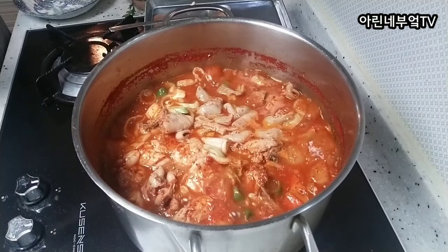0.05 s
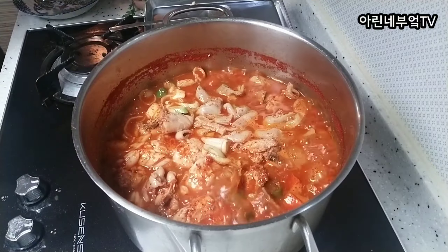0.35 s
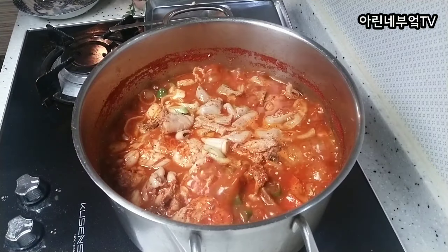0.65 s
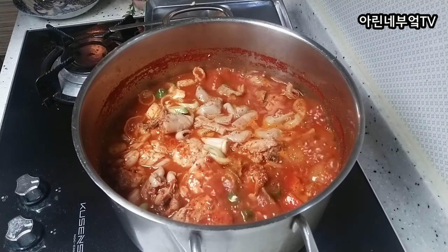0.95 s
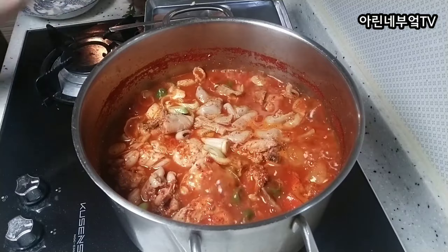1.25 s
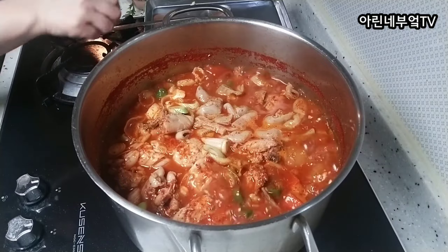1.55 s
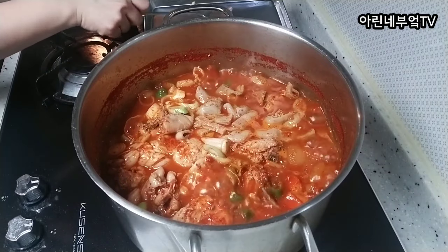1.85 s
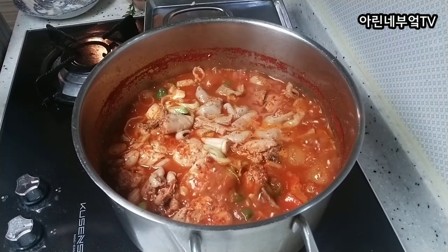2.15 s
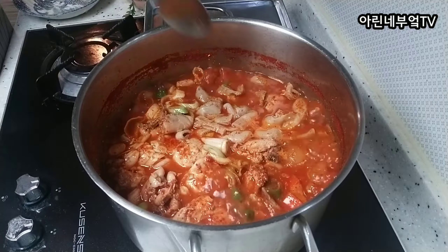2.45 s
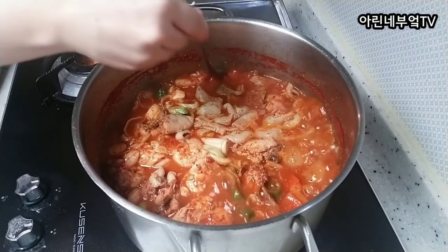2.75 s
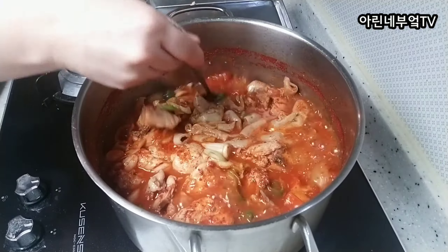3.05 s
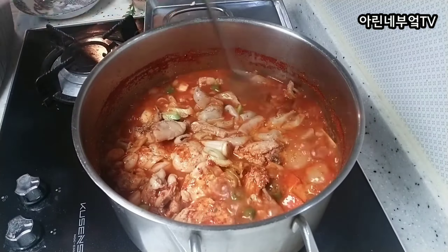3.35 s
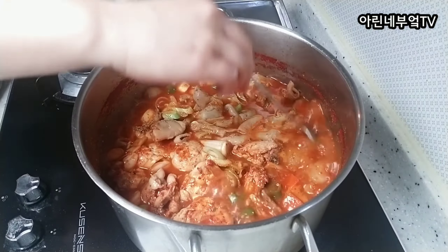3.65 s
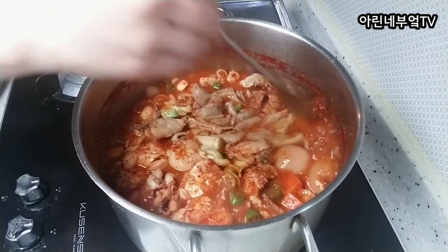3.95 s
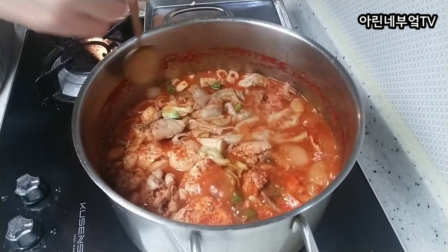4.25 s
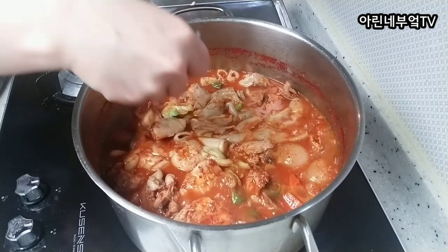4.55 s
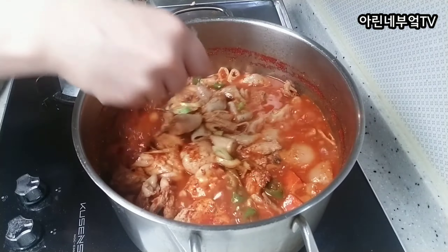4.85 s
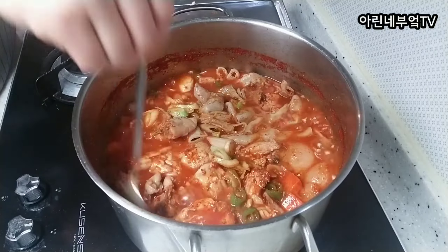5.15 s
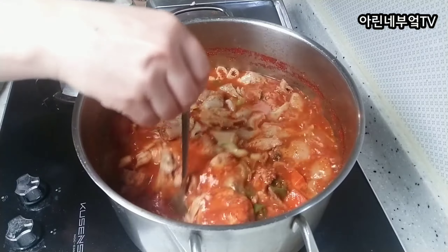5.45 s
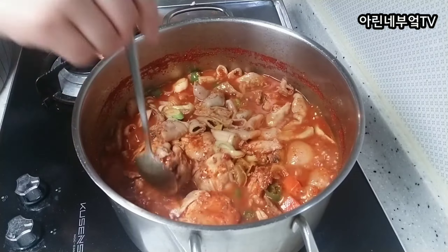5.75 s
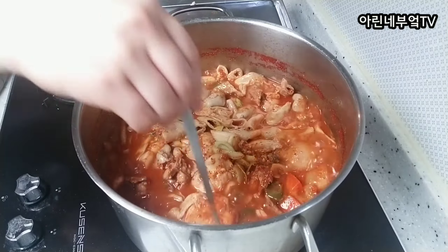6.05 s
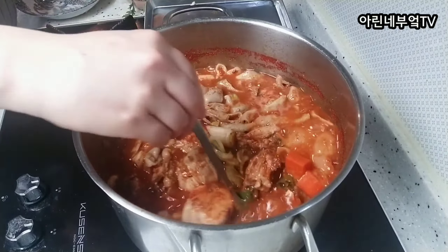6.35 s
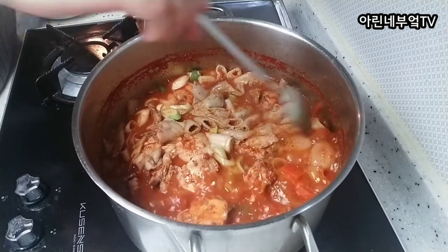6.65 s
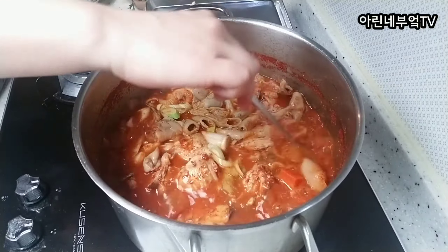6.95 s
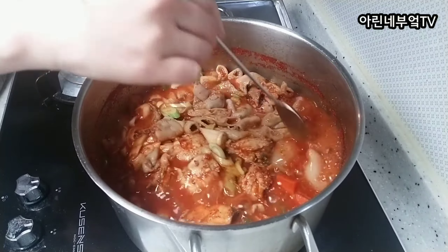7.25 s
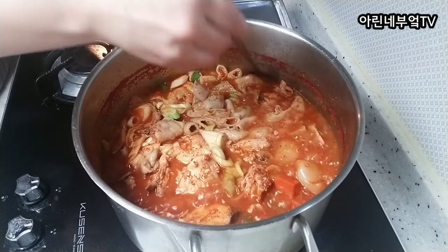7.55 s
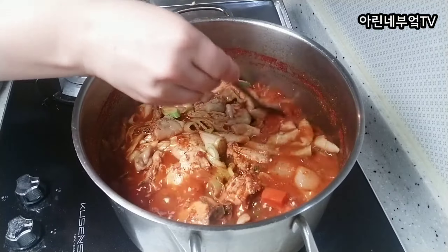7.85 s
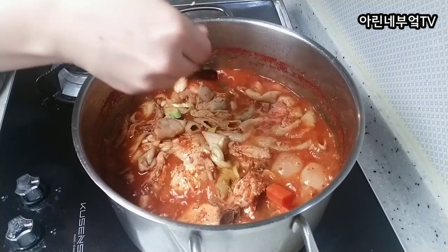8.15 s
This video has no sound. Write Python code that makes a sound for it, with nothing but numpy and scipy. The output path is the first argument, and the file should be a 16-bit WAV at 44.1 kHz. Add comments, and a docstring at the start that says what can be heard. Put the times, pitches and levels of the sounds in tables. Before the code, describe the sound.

Thick stew boils throughout in an open steel pot, heard close above the rim in a small kitchen with a slight echo. Small bubbles pop in clusters with a fine crackle and larger plops stand out, over the soft hiss and low roar of a gas burner. In the first 0.3 seconds utensils tap lightly with dull bumps. Around 0.9 seconds a few heavier thumps shake the counter, and a drop of broth sizzles briefly at about 1.2 seconds. Near 2 seconds a steel spoon is picked up with a chink and a small scrape. From about 2.8 seconds it stirs, knocking irregularly against the pot, with strong clinks between 4.4 and 4.9 seconds. Short scrapes come around 5.5 seconds and, louder, around 6.4 seconds. A hollow knock at 7.5 seconds and a sharp clink at 7.8 seconds follow as the bubbling continues.

```python
"""Stirring a boiling stew

Thick stew boils in an open steel pot on a hissing gas ring in a small kitchen. Bubbles burst
and ring the air in the pot; a steel spoon knocks, clinks and scrapes as it stirs.
Early on something thumps the counter, and a drop of broth sizzles into steam."""
import sys
import numpy as np
from scipy import signal
from scipy.fft import rfft, irfft
from scipy.io import wavfile

SR = 44100
rng = np.random.default_rng(int(sys.argv[2]) if len(sys.argv) > 2 else 0)


def master_out(mix):
    """Clip the mix to full scale and print it as 16-bit PCM to the path in sys.argv[1]."""
    frames = np.transpose(np.atleast_2d(mix))
    ceiling = np.clip(frames, -1, 1)
    pcm = np.round(ceiling * 32767).astype(np.int16)
    wavfile.write(sys.argv[1], SR, pcm)


N = 361179
TIME = np.arange(N) / SR


def from_db(db):
    """Turn decibels into a number to multiply a sound by."""
    return 10 ** (np.asarray(db) / 20)


def rms_one(x, size=None):
    """Scale a sound so its average strength (rms) is 1, judged on the first `size` samples if given."""
    return x / np.sqrt(np.mean(x[:size] ** 2) + 1e-20)


def curve(points):
    """Join (time, value) points with straight lines, giving a value for every sample."""
    return np.interp(TIME, *np.transpose(points))


def add(out, start_s, sound):
    """Mix a sound in at the given time."""
    at = int(np.clip(round(start_s * SR), 0, N - 1))
    out[at:at + len(sound)] += sound[:N - at]


def noise(t):
    """White noise, one sample for each time in t."""
    return rng.standard_normal(len(t))


def filtered(x, hz, kind, order=2):
    """Keep the "low" side, the "high" side or a "band"; a higher order cuts more sharply."""
    return signal.sosfilt(signal.butter(order, hz, kind, fs=SR, output="sos"), x)


def resonance(x, hz, width_hz):
    """Pick out one narrow note from a sound."""
    return signal.lfilter(*signal.iirpeak(hz, hz / width_hz, fs=SR), x)


def fade(t, t60):
    """Die away by 60 dB every t60 seconds."""
    return from_db(-60 * t / t60)


def struck(notes, t):
    """Ring an object's own notes; their strength and phase depend on the spot that is hit."""
    spot = rng.uniform(.55, 1.45, len(notes))
    ring = sum(gain * from_db(db) * fade(t, t60) * np.sin(2 * np.pi * (hz * t + rng.random()))
               for gain, (hz, db, t60) in zip(spot, notes))
    return rms_one(ring, size=400)


def coloured_noise(colour):
    """Steady noise with a given balance of low and high pitches."""
    hz, db = np.transpose(colour)
    gain = from_db(np.interp(np.log(np.fft.rfftfreq(N, 1 / SR) + 1), np.log(hz), db))
    return rms_one(irfft(rfft(noise(TIME)) * gain, N))


def drift(per_s):
    """Wander at random by about 1 either way, heading for a new value per_s times a second."""
    return np.interp(TIME * per_s, np.arange(1000), rng.standard_normal(1000))


# How loud the gas is; it sinks while the arm is over the pot: t/s, level/dB
GAS_LEVEL = [(0.0, -53), (0.41, -52.5), (4.65, -53.5), (5.24, -63), (5.5, -62), (5.81, -60.5), (6.43, -53),
             (7.64, -53.5), (8.19, -57.5)]
# The colour of the gas hiss: f/Hz, level/dB
HISS_COLOUR = [(1500, 17.5), (2500, 9), (3500, 8.5), (5600, 8), (7100, 4.5), (9000, -2), (10200, 1),
               (15500, -3.5)]
# The colour of the flame's roar: f/Hz, level/dB
ROAR_COLOUR = [(20, -25), (45, 5.5), (80, -1), (132, 9.5), (200, -0.5), (380, -3), (600, -7), (1300, -71),
               (2200, -10), (3500, -60)]
# The whistles of the gas jet: f/Hz, width/Hz, level/dB
JET_WHISTLES = [(7820, 550, 17), (8620, 140, 18), (9300, 38, 21), (9200, 410, 15.5)]
def burner(hiss_boost_db=7, roar_db=-45.5, jet_db=-56.5):
    """The flame roars low, the gas hisses, and the jet's thin whistles waver against one another."""
    gas_db = curve(GAS_LEVEL)
    swing_db = gas_db - gas_db.mean()
    whistles = np.zeros(N)
    for hz, width, db in JET_WHISTLES:
        gain = from_db(db - 0.4 * drift(3.14))
        band_hz = [hz - width / 2, hz + width / 2]
        whistles += gain * rms_one(filtered(noise(TIME), band_hz, "band", order=1))
    hiss = from_db(gas_db + hiss_boost_db + .5 * drift(30)) * coloured_noise(HISS_COLOUR)
    roar = from_db(roar_db + 0.66 * swing_db + 2.5 * drift(47)) * coloured_noise(ROAR_COLOUR)
    weak_start_db = curve([(2.2, -4), (2.39, 0)])  # the whistles grow stronger part-way through
    return hiss + roar + from_db(jet_db + swing_db + weak_start_db) * rms_one(whistles)


# The notes of the air held in the pot: f/Hz, level/dB, fade time t60/s
POT_AIR_NOTES = [(489, 1.5, 0.3), (633, -1, 0.45), (860, 11, 0.011), (1189.6, 20.5, 0.04),
                 (1266, 19, 0.027), (1547, 34, 0.0048), (1790, 12, 0.11)]
def pop(hz, snap_db=2, neighbour_db=-9, rise=0.019, wall_db=-30, air_db=-41):
    """A bubble opens and rings with rising pitch, three neighbours burst too, and the pot answers."""
    t = TIME[:4096]
    bubbles = from_db(snap_db) * noise(t) * fade(np.abs(t - .005), .012)  # begin with the snap
    starts = np.r_[.004, rng.uniform(0, .016, 3)]
    pitches = hz * np.r_[1, 2 ** rng.uniform(-.3, .75, 3)]
    gains = from_db([0] + 3 * [neighbour_db])
    for start, pitch, gain in zip(starts, pitches, gains):
        swell_s = 0.0011 * (1000 / pitch) ** 1.7  # big, low bubbles open slowly and ring longest
        opened = np.maximum(t - start, 0) / swell_s
        gliding_hz = pitch * (1 + rise * (np.minimum(opened, 6) - 2))
        cycles = np.cumsum(gliding_hz) / SR
        bubbles += gain * opened * np.exp(1 - opened) * np.sin(2 * np.pi * cycles)
    pot = from_db(wall_db) * noise(t) * fade(t, 0.077) + from_db(air_db) * struck(POT_AIR_NOTES, t)
    pot[0] += 1  # the sound that comes straight to the ear
    burst = signal.fftconvolve(bubbles, pot)[:len(t)]
    body = filtered(burst, max(2200, 1.19 * hz), "low", order=8)
    spray = from_db(-20) * filtered(burst, 4000, "low")
    return rms_one(body + spray, size=700)


BUBBLE_LOW_HZ = 156  # bubbles have little body below this
# How hard the stew boils, as the loudness of its small bubbles: t/s, level/dB
BOIL_LEVEL = [(0.0, -34.5), (0.45, -43.5), (0.7, -39.5), (0.83, -59), (1.1, -39.5), (2.8, -42),
              (2.94, -40.5), (3.35, -39.5), (3.7, -35), (4.36, -43), (4.81, -38.5), (5.08, -43.5),
              (5.3, -42.5), (5.47, -37.5), (5.64, -45.5), (5.8, -49), (5.9, -45.5), (6.32, -39.5),
              (6.68, -43.5), (7.07, -37), (7.8, -44), (8.19, -40.5)]
def simmer(per_s=85, size_db=5, centre_hz=920, spread_octaves=0.4326, bunching=0.65):
    """Many small bubbles of mixed pitch and size burst in loose clusters."""
    out = np.zeros(N)
    pitches = centre_hz * 2 ** (spread_octaves * np.linspace(-1.6, 1.6, 40))
    pops = [pop(hz, snap_db=-5) for hz in pitches]
    chances = rng.random((4000, 3))
    rate = per_s * np.exp(bunching * drift(20))
    for k, (when, size, luck) in enumerate(chances):
        if luck < rate[int(when * N)] * TIME[-1] / len(chances):
            gain = from_db(size_db * min(-np.log(size), 2))  # most are quiet, a few are loud
            add(out, when * TIME[-1], gain * pops[k % len(pops)])
    return from_db(curve(BOIL_LEVEL)) * rms_one(filtered(out, BUBBLE_LOW_HZ, "high"))


def bright_tick(hz, t60, width=1.34):
    """A short, bright tick: a band of noise that dies away quickly."""
    t = TIME[:5000]
    return rms_one(filtered(noise(t) * fade(t, t60), [hz / width, hz * width], "band"), size=1323)


def fizz(per_s=140, size_db=2.5, below_boil_db=19):
    """Tiny bubbles at the pot wall burst in a fine, uneven crackle that follows the boil."""
    out = np.zeros(N)
    ticks = [bright_tick(hz, t60=0.0092) for hz in np.geomspace(3000, 12000, 24)]
    for k, (when, size) in enumerate(rng.random((int(per_s * TIME[-1]), 2))):
        gain = from_db(size_db * min(-np.log(size), 3))
        add(out, when * TIME[-1], gain * ticks[k % len(ticks)])
    return from_db(curve(BOIL_LEVEL) - below_boil_db) * rms_one(out)


def balance_hit(hit, knock_db, clink_db, brightness, pivot_hz=2770, top_loss_db=56):
    """Set a hit's level in four bands: the hollow knock lowest, then the clink, tilted by brightness."""
    edges_hz = np.array([170, 800, 2500, 9000, 16000])
    clink_centres_hz = np.sqrt(edges_hz[1:-1] * edges_hz[2:])
    middle, high, top = clink_db + brightness * np.log2(clink_centres_hz / pivot_hz)
    levels_db = knock_db, middle, high, top - top_loss_db  # the highest band is kept very quiet
    return sum(from_db(db) * rms_one(filtered(hit, band_hz, "band", order=4), size=1323)
               for db, band_hz in zip(levels_db, zip(edges_hz, edges_hz[1:])))


# The notes of the steel pot and spoon: f/Hz, level/dB, fade time t60/s
STEEL_NOTES = [(1280, 7, 0.28), (1480, -3, 0.083), (1654, 9, 0.27), (1702, -17, 0.092), (1900, 7, 0.059),
               (2035, 10, 0.022), (2196, -8, 0.26), (2540, -19, 0.27), (2710, -4, 0.28), (3630, -14, 0.11),
               (3905, 7.5, 0.039), (4376, 11, 0.017), (4820, 2.5, 0.088), (5120, 3, 0.15), (5750, 1, 0.06),
               (6014, 0, 0.062), (6210, 4, 0.071), (6680, 8.5, 0.035), (8600, 2.5, 0.067)]
# Steel utensils knocking, first beside the pot, then the spoon in it: t/s, clink level/dB,
# brightness/(dB per octave), knock level/dB, contact time/s, fade time t60/s, pot f/Hz, spoon f/Hz
SPOON_HITS = [(0.1167, -41.5, 0.5, -38, 0.0034, 0.35, 1190, 4000),
              (0.17, -42.5, 11.5, -33.5, 0.0022, 0.022, 1170, 4700),
              (0.284, -55.5, 6, -45, 0.0041, 0.076, 800, 4800),
              (1.978, -40, -4, -32, 0.0088, 0.21, 670, 7560),
              (2.7807, -29.5, -3, -24, 0.0068, 0.067, 850, 6660),
              (2.911, -28.5, 3.5, -30, 0.0044, 0.026, 1590, 5000),
              (3.605, -36, -7.5, -29, 0.0064, 0.02, 480, 7340),
              (4.387, -29, -6.5, -25, 0.0043, 0.069, 420, 7740),
              (4.669, -21, 1, -26.5, 0.0034, 0.12, 696, 3470),
              (4.912, -22.5, -1.5, -27.5, 0.0026, 0.027, 1614, 5300),
              (5.398, -45, 12.5, -41, 0.002, 0.057, 650, 6400),
              (6.086, -41.5, -8, -28.5, 0.0057, 0.042, 890, 4120),
              (6.3002, -36.5, 3.5, -39.5, 0.00031, 0.048, 1060, 6370),
              (6.403, -29, 2.5, -30, 0.00089, 0.1, 1520, 5300),
              (6.742, -44, 7.5, -64, 0.0028, 0.024, 900, 5700),
              (6.864, -32.5, 2, -32, 0.0031, 0.054, 480, 6800),
              (6.9706, -34.5, 0.5, -62, 0.00014, 0.018, 2230, 5100),
              (7.526, -23.5, -5.5, -16.5, 0.0097, 0.011, 1127, 4330),
              (7.7719, -22, 1.5, -28.5, 0.00055, 0.078, 1870, 6060)]
def spoon_hits(held_db=-4.5, air_db=-1, note_db=5, free_db=-12, tail_db=-16):
    """A short rattling touch rings steel and air; food on the spoon dulls it, bare steel is bright."""
    out, t = np.zeros(N), TIME[:16384]
    for start_s, clink_db, brightness, knock_db, contact_s, t60, pot_hz, spoon_hz in SPOON_HITS:
        contact = fade(np.maximum(t - contact_s, 0), t60) + from_db(12.5) * fade(t, 0.0037)
        contact *= 1 - np.exp(-t / (1e-4 + .25 * contact_s))  # a longer touch starts more softly
        crack = filtered(noise(t) * contact, 240, "high", order=1)
        steel = struck(STEEL_NOTES, t)
        held_ring = from_db(held_db) * contact * steel
        air = from_db(air_db) * np.sqrt(contact) * struck(POT_AIR_NOTES, t)
        hit = filtered(crack + held_ring + air, 3800, "low", order=1)
        # the spot struck and the grip bring out one note of the pot and one of the spoon
        notes = resonance(hit, pot_hz, width_hz=110) + resonance(hit, spoon_hz, width_hz=220)
        hit += from_db(note_db) * notes
        # the wall rings on: its main notes over a crowd of weaker ones
        free_ring = from_db(free_db) * filtered(steel, 5500, "low", order=1)
        tail = from_db(tail_db) * filtered(noise(t), [1100, 5500], "band") * fade(t, 0.3)
        freedom = from_db(-700 * contact_s)  # a spoon that stays in the stew is hushed by it
        hit += freedom * (free_ring + tail)
        add(out, start_s, balance_hit(hit, knock_db, clink_db, brightness))
    return out


# Crisp, high ticks: drops of broth spatter off the spoon and utensils, mostly as they knock: t/s, level/dB,
# f/Hz
BROTH_SPATTERS = [(0.171, -37, 8800), (0.283, -47, 10500), (1.054, -44.5, 5940), (2.784, -41.5, 10500),
                  (2.911, -40, 10500), (2.93, -42, 11000), (4.387, -50, 9000), (4.67, -45, 12000),
                  (5.395, -47, 11000), (6.154, -49.5, 6000), (6.3, -43.5, 10400), (6.864, -46, 10500),
                  (7.273, -42, 5350), (7.771, -33, 8600)]
def broth_spatters():
    """Short bursts of high noise: drops of broth snap and spatter, most of them as a knock of steel lands."""
    out = np.zeros(N)
    for start_s, db, hz in BROTH_SPATTERS:
        add(out, start_s, from_db(db) * bright_tick(hz, t60=0.083))
    return out


# The low notes of the counter and stove: f/Hz, level/dB, fade time t60/s
COUNTER_NOTES = [(65, -8, 0.33), (85, -7.5, 0.23), (115, -3.5, 0.18), (227, 1.5, 0.045), (430, -10, 0.055)]
# Dull bumps through the counter: t/s, level/dB, lowest f/Hz, highest f/Hz
COUNTER_BUMPS = [(0.172, -15.5, 173, 300), (0.283, -19.5, 181, 290), (0.851, -10, 55, 550),
                 (0.912, -17, 80, 400), (0.991, -21, 70, 557), (1.064, -17.5, 107, 260)]
def bumps(rattle_db=6, clack_db=-21, grate_db=-27, grate_hz=780, onset_s=0.0036):
    """Soft, heavy bumps shake the counter; things on it rattle and clack, and the stove grate rings."""
    out, t = np.zeros(N), TIME[:24000]
    boom = sum(from_db(db) * fade(t, t60) * np.sin(2 * np.pi * hz * t) for hz, db, t60 in COUNTER_NOTES)
    grate = from_db(grate_db) * fade(t, 0.52) * np.sin(2 * np.pi * grate_hz * t)
    for start_s, db, low_hz, high_hz in COUNTER_BUMPS:
        rattle = from_db(rattle_db) * noise(t) * fade(t, 0.17)
        clack = from_db(clack_db) * rms_one(filtered(noise(t), [1200, 2400], "band")) * fade(t, 0.11)
        thud = filtered((boom + rattle) * np.minimum(t / onset_s, 1), [low_hz, high_hz], "band")
        add(out, start_s, from_db(db) * (grate + thud + clack))
    return out


# The biggest bubbles, heard above the simmer: t/s, level/dB, f/Hz
BIG_BUBBLES = [(0.728, -29, 725), (0.805, -31, 705), (0.968, -34.5, 745), (1.198, -31, 678),
               (1.568, -31, 1220), (1.585, -30.5, 1970), (1.676, -30.5, 927), (1.703, -36, 1210),
               (1.801, -38, 1340), (1.878, -29, 1190), (1.9, -32.5, 647), (1.992, -30, 786),
               (2.018, -32, 1333), (2.062, -33, 890), (2.235, -36, 1330), (2.258, -35, 1310),
               (2.408, -32.5, 1126), (2.865, -35.5, 670), (3.247, -29.5, 720), (3.283, -35, 1200),
               (3.31, -36.5, 698), (3.444, -30.5, 1447), (3.515, -29.5, 1000), (3.608, -23, 515),
               (3.653, -25.5, 785), (3.771, -29.5, 1200), (3.875, -35.5, 2400), (3.984, -36.5, 1237),
               (3.998, -32, 1360), (4.091, -31, 1490), (4.193, -32.5, 917), (4.211, -27.5, 1020),
               (4.255, -33.5, 1223), (4.438, -30.5, 1300), (4.552, -29.5, 874), (4.826, -32, 630),
               (5.101, -30.5, 743), (5.2, -36.5, 700), (5.228, -39, 916), (5.295, -32, 824),
               (5.891, -35, 1205), (5.982, -36, 874), (6.205, -40, 1394), (6.497, -36.5, 663),
               (6.697, -31, 883), (6.836, -31, 2010), (7.053, -32, 1290), (7.064, -30, 1190),
               (7.11, -35, 690), (7.201, -28.5, 1230), (7.26, -31.5, 1016), (7.303, -26, 1153),
               (8.162, -31, 1260)]
def big_bubbles():
    """Single bubbles break the surface; each starts to open just before its peak."""
    out = np.zeros(N)
    for peak_s, db, hz in BIG_BUBBLES:
        add(out, peak_s - .005, from_db(db) * pop(hz))
    return filtered(out, BUBBLE_LOW_HZ, "high")


# The colour of the sizzling drop: f/Hz, level/dB
STEAM_COLOUR = [(600, -29), (2000, 6), (6000, 1), (10000, -2), (16000, -7)]
def sizzle(start_s=1, onset_s=0.025, peak_s=1.195, peak_db=-39.5, swell_db_per_s=59, fade_db_per_s=71):
    """A drop of broth flashes to steam in a brief, bright hiss."""
    past_peak_s = TIME - peak_s
    level_db = peak_db + np.minimum(swell_db_per_s * past_peak_s, -fade_db_per_s * past_peak_s)
    onset = np.clip((TIME - start_s) / onset_s, 0, 1)
    return onset * from_db(level_db + 2 * drift(110)) * coloured_noise(STEAM_COLOUR)


# The spoon chinks as it is picked up: t/s, level/dB, f/Hz
SPOON_CHINKS = [(1.923, -49, 7230), (1.978, -51, 7550), (2.024, -45, 7050), (2.028, -44, 5550)]
def spoon_chinks(t60=0.063, tick_db=-6):
    """Steel touches steel lightly: a tick and a high, thin ring."""
    out, t = np.zeros(N), TIME[:8000]
    for start_s, db, hz in SPOON_CHINKS:
        tick = rms_one(filtered(noise(t), [hz / 2, hz], "band")) * fade(t, .03)
        ring = struck([(hz, 0, t60), (1.02 * hz, -4, t60 / 2)], t)
        add(out, start_s, from_db(db) * (ring + from_db(tick_db) * tick))
    return out


# The high, thin notes of the spoon's edge: f/Hz, level/dB, fade time t60/s
EDGE_NOTES = [(10700, 0, 0.0098), (13700, -10, .006), (15400, -11, .008)]
# The spoon dragged over steel: t/s, length/s, grind level/dB, rasp level/dB, squeal level/dB, pot f/Hz
SPOON_SCRAPES = [(1.979, 0.14, -42, -50, -66, 1490), (4.221, 0.015, -34, -41.5, -75, 1780),
                 (5.415, 0.16, -42.5, -50, -65, 1950), (5.517, 0.037, -35, -45, -70, 1950),
                 (5.587, 0.057, -36.5, -52, -73, 1890), (6.303, 0.21, -40, -47, -58, 2420),
                 (6.385, 0.074, -26.5, -36.5, -67, 1540), (7.02, 0.023, -35.5, -34, -72, 1930)]
def spoon_scrapes(slips_per_s=600, grit_db=-3, note_db=-1, grind_hz=(1070, 2550), rasp_hz=(1960, 5300)):
    """The spoon's edge sticks and slips, ringing the steel: a low grind, a bright rasp, a thin squeal."""
    out, t = np.zeros(N), TIME[:12000]
    for start_s, length_s, grind_db, rasp_db, squeal_db, pot_hz in SPOON_SCRAPES:
        samples = int(length_s * SR)
        pressure = np.sqrt(np.abs(np.sin(np.pi * np.minimum(t / length_s, 1))))
        slips = rng.random(len(t)) < slips_per_s / SR
        friction = (0.24 + slips) * noise(t) * pressure
        pressed_steel = struck(STEEL_NOTES, t) * fade(t, .09)  # pressing on steel shortens its ring
        ring = signal.fftconvolve(friction, pressed_steel)[:len(t)]
        squeal = signal.fftconvolve(friction, struck(EDGE_NOTES, t))[:len(t)]
        add(out, start_s, from_db(squeal_db) * rms_one(squeal, size=samples))
        pot_note = resonance(friction, pot_hz, width_hz=100)
        pot_note = from_db(note_db) * rms_one(resonance(pot_note, pot_hz, width_hz=200))
        for db, band_hz, note in ((grind_db, grind_hz, pot_note), (rasp_db, rasp_hz, 0)):
            grit = from_db(grit_db) * rms_one(filtered(friction, band_hz, "band"))
            rub = note + rms_one(filtered(ring, band_hz, "band")) + grit
            add(out, start_s, from_db(db) * rms_one(rub, size=samples))
    return out


def kitchen(x, echo_db=-14, t60=0.18):
    """Hard walls add a short, blurred echo."""
    t = TIME[:16384]
    echo = filtered(noise(t), 6000, "low", order=1) * fade(t, t60) * np.minimum(t / 0.0006, 1)
    return x + from_db(echo_db) * signal.fftconvolve(x, echo / np.linalg.norm(echo))[:N]


def scene():
    """Pot, spoon and stove, heard in one channel from just above the rim."""
    stew = big_bubbles() + simmer() + fizz()
    utensils = spoon_hits() + broth_spatters() + spoon_scrapes() + spoon_chinks()
    return (kitchen(stew + utensils + bumps()) + burner() + sizzle())[None]


def record(dry):
    """Clip any peaks at full scale and cut the treble above 16000 Hz."""
    treble_cut = signal.ellip(10, .2, 80, 16000, fs=SR, output="sos")
    return signal.sosfilt(treble_cut, np.clip(dry, -1, 1))


dry = scene()
out = record(dry)
master_out(out)
```